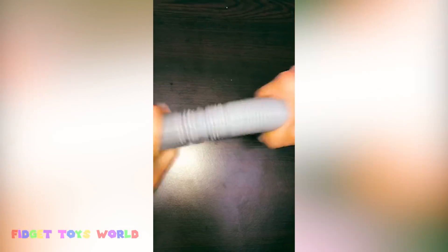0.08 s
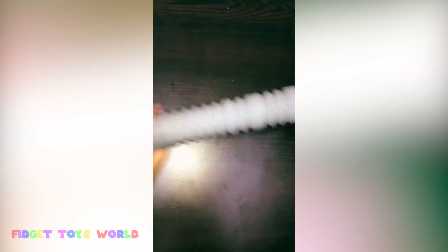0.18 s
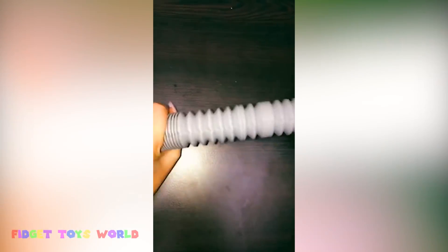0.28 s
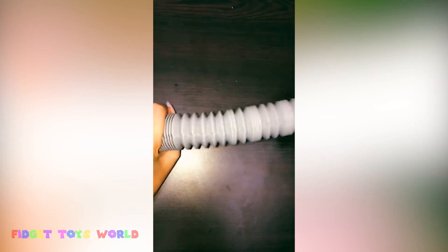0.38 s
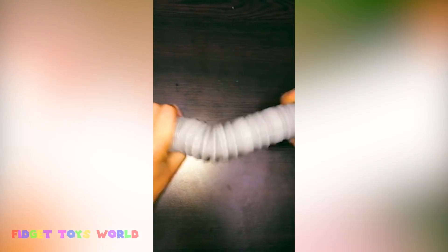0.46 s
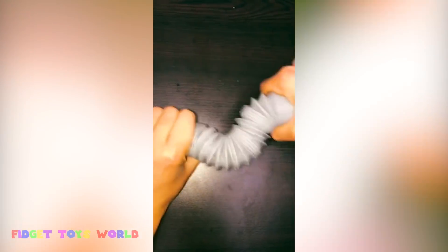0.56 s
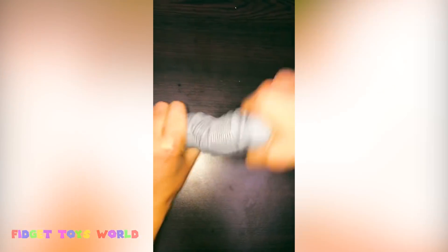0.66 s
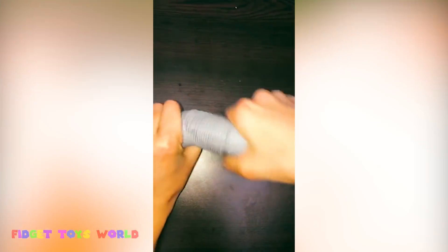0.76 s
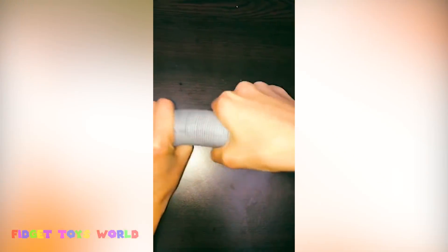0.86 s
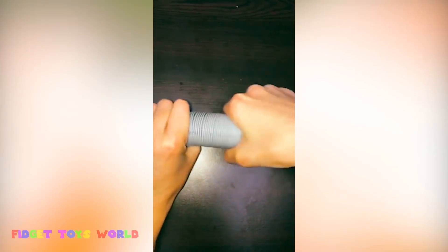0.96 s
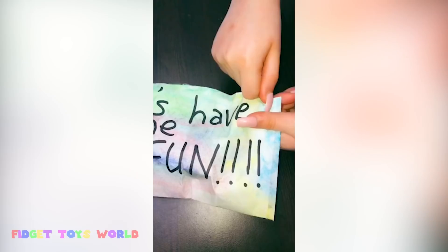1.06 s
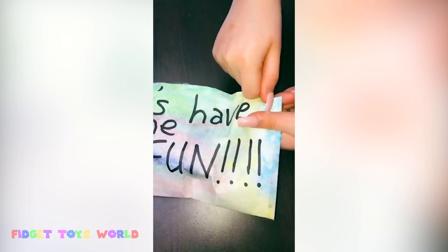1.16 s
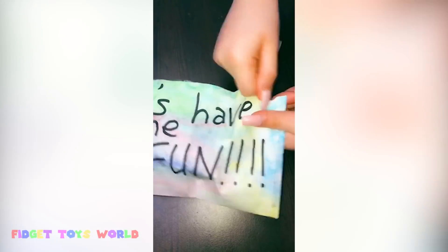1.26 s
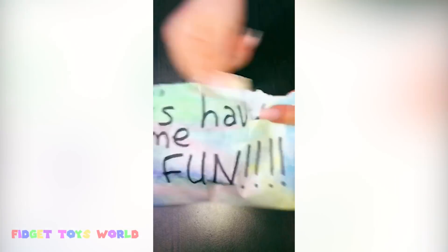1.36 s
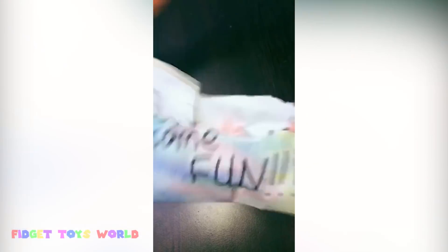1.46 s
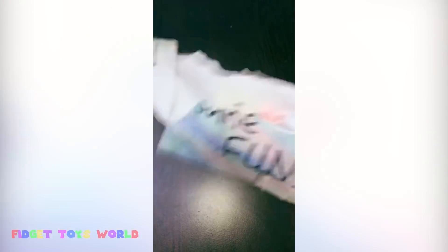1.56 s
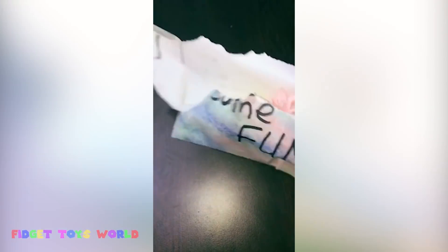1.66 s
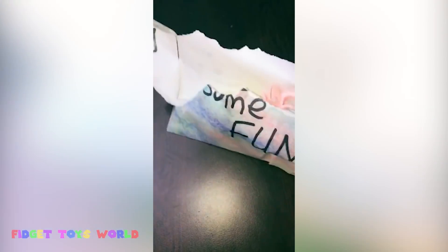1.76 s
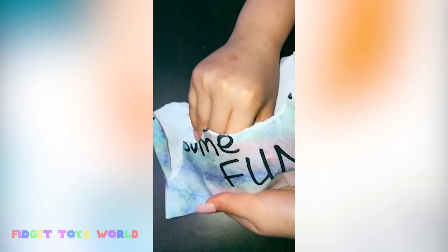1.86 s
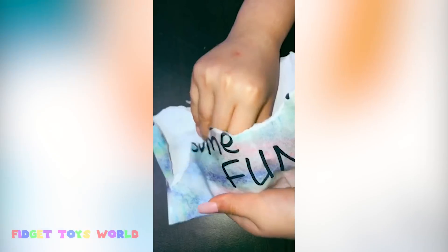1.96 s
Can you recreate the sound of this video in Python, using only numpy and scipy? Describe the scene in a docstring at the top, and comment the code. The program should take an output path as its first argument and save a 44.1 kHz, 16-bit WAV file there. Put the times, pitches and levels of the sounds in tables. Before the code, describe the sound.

Close up in a small room, a corrugated plastic tube gives a fast ripple of pops, pauses, then a longer, looser run. The sound cuts out briefly, and a paper bag rips, ending with a flick.

```python
"""A corrugated plastic tube is stretched, then squashed: its ribs buckle one by one, and each pop excites
the wall and the air column, whose resonance falls as the tube lengthens and rises as it shortens.
After a sudden silence a paper bag is torn, its fibres breaking in tiny clicks, and is flicked;
a second silence ends the sound. A small room reverberates over handling rumble and quiet room tone."""
import sys
import numpy as np
from scipy import signal
from scipy.fft import rfft, irfft, next_fast_len
from scipy.io import wavfile
from scipy.ndimage import map_coordinates

SR = 44100
rng = np.random.default_rng(int(sys.argv[2]) if len(sys.argv) > 2 else 0)


def master(y):
    """Save y as 16-bit WAV."""
    cut = np.clip(np.atleast_2d(y).T, -1, 1)
    pcm = np.round(cut * 32767)  # scale
    wavfile.write(sys.argv[1], SR, pcm.astype(np.int16))


N = 88200

# Rib pops: t/s, level/dB, wall f/Hz; then, relative to that level, column fundamental/dB,
# upper modes/dB, crack/dB, knock/dB; last, column decay time/ms
POPS = [(0.1675, -52.5, 2600, -7, -8.5, -14.5, -4, 12.5), (0.2134, 0, 1375, -6.5, -10, -32, -30, 13),
        (0.2284, -2, 1475, -17, -8.5, -32.5, -21, 14.5), (0.2329, 1.5, 2430, 0.5, -14.5, -31.5, -34, 14),
        (0.2478, -0.5, 2100, -7.5, -15, -29, -35, 11.5), (0.2524, -5, 2240, -0.5, 7.5, -35.5, -27.5, 14.5),
        (0.2554, -7.5, 2220, -10.5, -10.5, -32, -27.5, 11),
        (0.2634, -4.5, 2120, -4.5, -3.5, -26.5, -26, 16), (0.2694, 1, 2490, -3.5, 2, -35.5, -24.5, 7),
        (0.2724, 0.5, 1560, -10, -9, -34, -30.5, 13), (0.2824, 0.5, 2554, -5.5, -19.5, -42, -39.5, 3),
        (0.2854, -8, 2340, -9, -2.5, -23.5, -23.5, 11), (0.2972, 0.5, 2322, -13, -13, -35.5, -25.5, 15),
        (0.5596, -4.5, 1657, -12.5, -1, -13, -38, 25), (0.5734, -17.5, 1350, 8.5, -6, -7, -6.5, 10.5),
        (0.5876, -8.5, 2190, 1, 0.5, -15.5, -27, 18), (0.605, -5.5, 1466, -16, -3, -12, -19.5, 8.5),
        (0.6184, -10, 2440, -0.5, -9, -22.5, -22, 18), (0.6275, -11, 2380, 6.5, -26, -12.5, -16.5, 12.5),
        (0.6389, -21, 1300, -12.5, -30.5, -17, -28, 3), (0.6424, -6, 1554, -4, -12.5, -15.5, -25, 4.5),
        (0.6704, -27, 1280, 19, -4.5, -31, -16, 6), (0.6913, -11, 2260, 0.5, -5, -17, -17.5, 5.5),
        (0.7292, -10, 1370, -11, -15, -9, -23.5, 9.5), (0.7502, -5.5, 2180, 2, -40.5, -26, -28.5, 8),
        (0.7677, 1, 2150, -12, -23.5, -18.5, -41.5, 4.5), (0.7724, -13, 2000, 9, -12.5, -21.5, -39, 8.5),
        (0.7851, 0, 1524, -22, -20.5, -22, -27.5, 2.5), (0.7914, -5, 1494, -8.5, 0, -9, -36, 7.5),
        (0.7964, -7, 1430, -0.5, -20.5, -9.5, -38, 3), (0.8074, -7, 2960, 2.5, -33, -8, -28.5, 11.5),
        (0.8134, -9, 1600, 3.5, -31, -19.5, -21, 6), (0.8244, -21, 1520, -4, -36.5, -29.5, -17.5, 13),
        (0.8474, -22.5, 1580, 6, 0, -25, -21, 10.5), (0.8714, -20.5, 1430, 5.5, -11.5, -14, -31, 10),
        (0.8944, -10.5, 2270, 2.5, -24.5, -17, -30, 7.5), (0.9004, -14.5, 1690, -7, -1.5, -12.5, -24, 8),
        (0.9203, -20, 1710, 6, -9, -28, -34, 9.5)]
# Fundamental of the air column: t/s, f/Hz
COLUMN_PITCH = [(.21, 698), (.24, 616), (.27, 561), (.3, 501), (.34, 473), (.55, 574), (.6, 575.7),
                (.65, 625.5), (.7, 635), (.75, 667), (.8, 753), (.87, 789), (.93, 852.4), (1.0, 808),
                (1.15, 800)]
# Modes of one rib: f/Hz, level/dB, T60/s
RIB_MODES = [(2630, -9, 0.02), (3696, -5, 0.011), (4380, -12, 0.004), (5700, -5, 0.012),
             (8050, -12.5, 0.0073)]
# Faint, short tones near 800 Hz lingering after the last pop: t/s, level/dB
AFTER_TONES = [(0.954, -28.5), (0.975, -25.5), (1.015, -27.5), (1.039, -30.5), (1.075, -40.5),
               (1.102, -38.5)]
def tube_resonance():
    """Impulse excitation: each rib rings the wall and the air column, whose pitch follows its length."""
    out, t = np.zeros(N), np.arange(SR // 8) / SR
    running_phase = 2 * np.pi * np.cumsum(curves(COLUMN_PITCH)[0]) / SR
    phase = lambda s: running_phase[round(s * SR):][:len(t)] - running_phase[round(s * SR)]
    fade = lambda decay_s: np.exp(-(t / decay_s) ** 1.1) * (1 - np.exp(-t / 0.00086))
    for s, db, wall_hz, column_db, upper_db, _, _, decay_ms in POPS:
        scatter = rng.standard_normal((len(RIB_MODES), 2))  # no two ribs are alike
        wall = amp(7.5) * ring(t, wall_hz, t60=0.025)
        for (hz, level, t60), (louder, sharper) in zip(RIB_MODES, scatter):
            wall += amp(level + 2.2 * louder) * ring(t, hz * (1 + 0.017 * sharper), t60)
        fundamental = np.sin(phase(s) * (1 + 0.015 * scatter[0, 0]))
        overtones = np.sin(1.95 * phase(s)) + amp(-14.5) * np.sin(2.4 * phase(s))
        column = amp(column_db + 11) * fade(max(decay_ms, 3) / 1000) * fundamental
        column += amp(upper_db + 4.5) * fade(0.016) * overtones
        out[round(s * SR):][:len(t)] += amp(db - 12.5) * (wall + column)
    for s, db in AFTER_TONES:
        out[round(s * SR):][:len(t)] += amp(db - 3) * fade(0.011) * np.sin(phase(s))
    return out


# Spectra of the plastic's snap, its treble crack, the wall's crinkle and the hands' knock: f/Hz, level/dB
SNAP = [(800, -4.5), (1500, 2.5), (2600, 2), (4000, -9.5), (5800, -10), (8000, -25), (16000, -57)]
CRACK = [(4000, -34.5), (7000, 7.5), (11000, 0), (16000, 1)]
CRINKLE = [(3000, -8), (5500, 0), (7500, 3), (10000, -17), (15000, -16)]
KNOCK = [(120, -11), (250, 3.5), (380, 7), (550, -9)]
def rib_buckling():
    """Snap-through buckling: each rib radiates a broadband burst; the wall crinkles, the hands knock."""
    s, db, *_, crack_db, knock_db, _ = np.transpose(POPS)
    snaps = bursts(s, db - 3.5, t60=0.019, rise=0.00089) * noise(SNAP)
    cracks = bursts(s, db + crack_db - 2, t60=0.029, rise=0.00089) * noise(CRACK)
    crinkle = bursts(s, db - 35, t60=0.055, rise=0.0039) * amp(2.3 * wobble(300)) * noise(CRINKLE)
    knocks = bursts(s, db + knock_db + 4, t60=0.051, rise=0.0058) * noise(KNOCK)
    return snaps + cracks + crinkle + knocks


# Envelope of the tear: t/s, level/dB, relative treble level/dB
TEAR = [(1.272, -61.5, -9), (1.35, -52.5, 5), (1.4, -26.5, -2.5), (1.432, -27.5, 0), (1.486, -17.5, 0),
        (1.494, -18.5, 3.5), (1.624, -16, -3.5), (1.648, -17, -3.5), (1.658, -15, -4), (1.706, -16.5, -3.5),
        (1.716, -19.5, -26.5), (1.726, -31, -31), (1.85, -51.5, -17), (1.94, -47, -6.5)]
# Stronger rips: t/s, level/dB, rasp f/Hz
RIPS = [(1.3329, -35, 2320), (1.399, -22.5, 3980), (1.4393, -20.5, 1417), (1.4531, -11.5, 1930),
        (1.4786, -2, 2090), (1.4864, -4, 2710), (1.509, -8, 2520), (1.5174, -8.5, 2300), (1.5377, -6, 3980),
        (1.5604, -3, 2754), (1.5871, -14, 2730), (1.6035, -6.5, 2570), (1.6581, 2, 2820),
        (1.668, -3.5, 2540), (1.6798, -0.5, 2570), (1.6853, -9, 2300), (1.7119, -5, 1790),
        (1.7344, -20, 1930), (1.769, -23, 1470), (1.7714, -23, 4090)]
# Envelope of the flapping sheet: t/s, upper band level/dB, lower band level/dB
FLAP = [(1.272, -77.5, -69.5), (1.452, -35, -45.5), (1.482, -26.5, -48), (1.506, -32, -38),
        (1.596, -27, -29.5), (1.636, -30.5, -33.5), (1.72, -26.5, -29), (1.75, -48, -51),
        (1.776, -39, -44.5), (1.834, -53.5, -54.5), (1.926, -59, -59.5), (1.94, -51, -58.5)]
# Spectra of the fibres (middle, treble) and the sheet (upper, lower): f/Hz, level/dB
FIBRE_MID = [(350, -19), (600, -5), (940, -5.5), (1030, -6.5), (1280, -4), (2700, -0.5), (3430, -7),
             (4070, -2), (6500, -20.5), (8450, -53), (14300, -120)]
FIBRE_TREBLE = [(3240, -39), (5500, -0.5), (7590, -2.5), (9490, 4), (10500, -3), (15100, 4), (16000, -13)]
SHEET_UPPER = [(150, -36.5), (250, -2), (383, -2.5), (555, 0.5), (700, -7), (910, -35), (1540, -120)]
SHEET_LOWER = [(70, 3), (90, -6), (240, -5), (290, -13)]
def paper_tear(start_s=1.2715, clicks_per_s=5000, click_share=0.55):
    """Fracture: fibres part in clumps of tiny clicks, stronger rips stand out, the sheet flaps below."""
    breaks = rng.random(N) < clicks_per_s / SR
    clicks = breaks * amp(3 * np.minimum(rng.exponential(size=N), 3)) * rng.choice([-1, 1], N)
    force = click_share * unit(clicks) + (1 - click_share) * rng.standard_normal(N)
    force *= amp(1.94 * wobble(150))
    mid, treble = coloured(force, FIBRE_MID), coloured(force, FIBRE_TREBLE)
    level_db, treble_db = curves(TEAR)
    tearing = amp(level_db - 4.5) * (mid + amp(treble_db) * treble)
    rasps, t = np.zeros(N), np.arange(SR // 20) / SR
    for s, db, hz in RIPS:
        rasps[round(s * SR):][:len(t)] += amp(db - 7.5) * ring(t, hz, t60=0.032, rise=0.0007)
    s, db, _ = np.transpose(RIPS)
    rips = bursts(s, db - 16, t60=0.015, rise=0.00054) * (mid + 0.7 * treble)
    upper_db, lower_db = curves(FLAP)
    flutter = amp(1.2 * wobble(40.1))
    flap = flutter * (amp(upper_db) * noise(SHEET_UPPER) + amp(lower_db) * noise(SHEET_LOWER))
    return (np.arange(N) > start_s * SR) * (tearing + rips + rasps * np.abs(mid) + flap)


# Modes of the flicked bag: f/Hz, level/dB, T60/s
BAG_MODES = [(1520, 5.5, 0.0075), (2904, 2, 0.0062), (850, -24.5, .015), (3680, -11, 0.019),
             (5310, -8, 0.0064)]
def bag_flick(start_s=1.9489):
    """Free vibration: a finger's impact excites the bag's heavily damped modes."""
    t = np.maximum(np.arange(N) / SR - start_s, 0)
    return -amp(-11) * sum(amp(db) * ring(t, hz, t60) for hz, db, t60 in BAG_MODES)


# Reverberation time: f/Hz, T60/s
ROOM_T60 = [(150, 0.17), (700, 0.61), (2000, 0.48), (6000, 0.39), (14000, 0.26)]
# Spectrum of the reverberation: f/Hz, level/dB
ROOM_COLOUR = [(200, 2), (350, 0.5), (600, -5), (1100, -0.5), (2500, -3), (7000, 1), (14000, 0)]
def reverberation(x, t60_factor=1):
    """Frequency-dependent decay: each tenth of a second is convolved with its own dying noise tail."""
    out, step, delay = np.zeros(N + 2 * SR), SR // 10, 200
    for start in range(0, N, step):
        part = x[start:start + step]
        if np.abs(part).max() > 1e-4:
            hz, t, spectrum = signal.stft(rng.standard_normal(SR), SR, nperseg=256)
            t60 = t60_factor * along(ROOM_T60, hz)[:, None]
            spectrum *= amp(along(ROOM_COLOUR, hz)[:, None] - 60 * t / t60)
            tail = signal.istft(spectrum, SR, nperseg=256)[1][:SR]
            wet = signal.fftconvolve(part, tail / np.linalg.norm(tail))
            out[start + delay:][:len(wet)] += wet
    return out[:N]


# Envelope of the handling rumble: t/s, level/dB
RUMBLE = [(0.0, -56), (0.172, -59), (0.27, -45), (0.314, -35), (0.362, -53), (0.516, -65), (0.624, -30.5),
          (0.878, -46), (0.912, -42.5), (1.156, -53.5), (1.216, -89), (1.34, -46), (1.378, -60.5),
          (1.492, -51), (1.51, -43), (1.732, -28.5), (1.786, -42), (1.95, -53)]
# Spectra of the rumble and the room tone: f/Hz, level/dB
RUMBLE_COLOUR = [(15, -5.5), (30, -3.5), (60, -4.5), (110, -16), (250, -33)]
ROOM_TONE = [(59, -38.5), (100, -3), (160, -7.5), (181, -10.5), (461, -17), (891, -21.5), (4770, -28),
             (16000, -38.5)]
def background():
    """Amplitude-modulated noise: low handling rumble swells and fades over steady room tone."""
    rumble = amp(curves(RUMBLE)[0] - 2 + 0.8 * wobble(5)) * noise(RUMBLE_COLOUR)
    return rumble + amp(-65.5) * noise(ROOM_TONE)


def amp(db):
    return 10 ** (np.asarray(db) / 20)


def unit(x):
    return x / np.sqrt(np.mean(x ** 2) + 1e-20)


def along(points, hz):
    """Interpolation on a logarithmic frequency axis."""
    f, v = np.transpose(points)
    return np.interp(np.log(hz + 1), np.log(f + 1), v)


def curves(rows):
    """Linear interpolation in time: one value per sample for each column after the first."""
    s, *cols = np.transpose(rows)
    return [np.interp(np.arange(N) / SR, s, c) for c in cols]


def wobble(rate):
    """Random modulation: a smooth curve with rate knots a second."""
    return map_coordinates(rng.standard_normal(int(N * rate / SR) + 4), [np.arange(N) * rate / SR])


def coloured(x, points):
    """Band-pass filtering by a (f/Hz, level/dB) curve, scaled to rms 1."""
    m = next_fast_len(N + 8192)
    f = np.fft.rfftfreq(m, 1 / SR)
    closed = [(points[0][0] / 2, -90)] + list(points) + [(points[-1][0] * 2, -90)]
    return unit(irfft(rfft(x, m) * amp(along(closed, f)), m)[:N])


def noise(points):
    return coloured(rng.standard_normal(N), points)


def ring(t, hz, t60, rise=0.00034):
    """Damped oscillation of one mode; t60 and rise in seconds."""
    return np.sin(2 * np.pi * hz * t) * amp(-60 * t / t60) * (1 - np.exp(-t / rise))


def bursts(times, levels_db, t60, rise):
    """Superposition of sudden, exponentially decaying envelopes."""
    hits, t = np.zeros(N), np.arange(SR // 10) / SR
    hits[np.round(np.asarray(times) * SR).astype(int)] = amp(levels_db)
    return signal.fftconvolve(hits, amp(-60 * t / t60) * (1 - np.exp(-t / rise)))[:N]


def scene():
    """Superposition of direct sound, reverberation and background."""
    tube = tube_resonance() + rib_buckling()
    bag = paper_tear() + bag_flick()
    room = reverberation(amp(-15) * tube + amp(-13.5) * bag)
    slow_tail = amp(-31.5) * reverberation(tube, t60_factor=1.7)
    return (tube + bag + room + slow_tail + background())[None]


# Silences: start t/s, end t/s
SILENCES = [(1.1535, 1.2715), (1.9537, 2.1)]
def record(dry):
    """Soft saturation, gating to two silences and low-pass filtering."""
    x = dry / (1 + np.abs(dry / 0.93) ** 6) ** (1 / 6)
    t = np.arange(N) / SR
    for start, end in SILENCES:
        x = x * ((t < start) | (t > end))
    top_hz, edge_hz = 16000, 500
    m = next_fast_len(N + 8192)
    edge = np.clip((top_hz - np.fft.rfftfreq(m, 1 / SR)) / edge_hz, 0, 1)
    return irfft(rfft(x, m) * np.sin(np.pi / 2 * edge) ** 2, m)[..., :N]


dry = scene()
out = record(dry)
master(out)
```